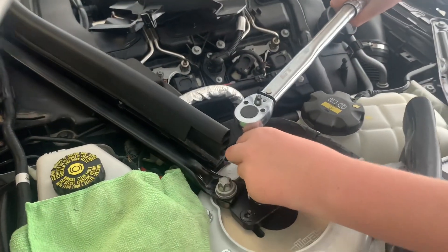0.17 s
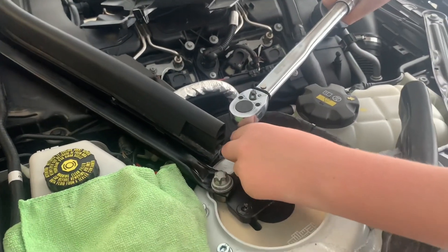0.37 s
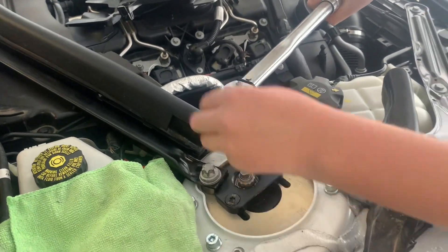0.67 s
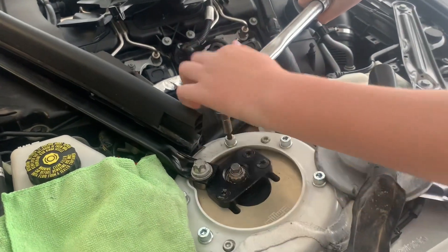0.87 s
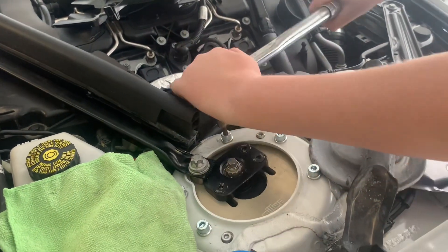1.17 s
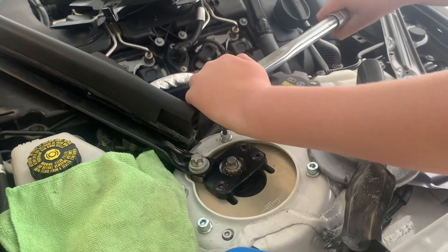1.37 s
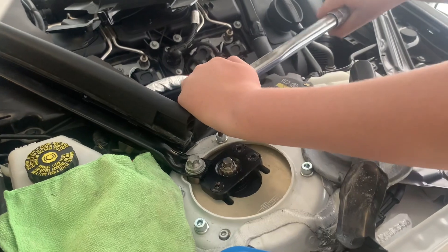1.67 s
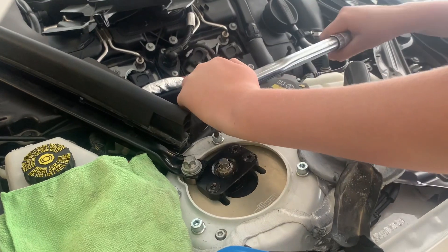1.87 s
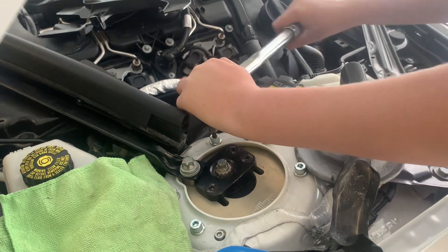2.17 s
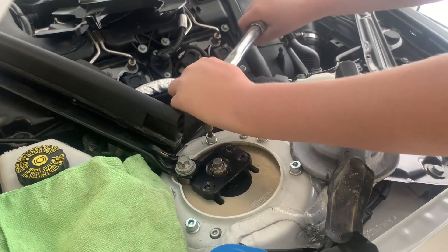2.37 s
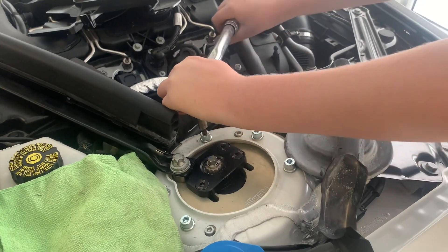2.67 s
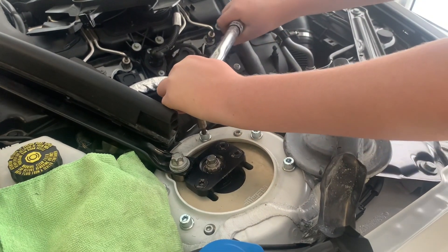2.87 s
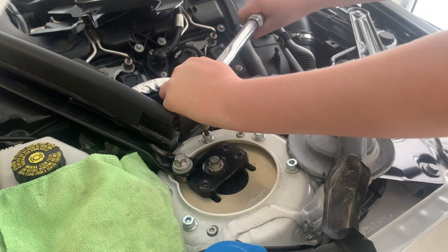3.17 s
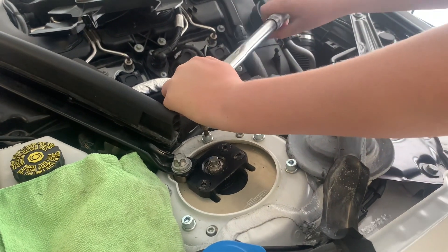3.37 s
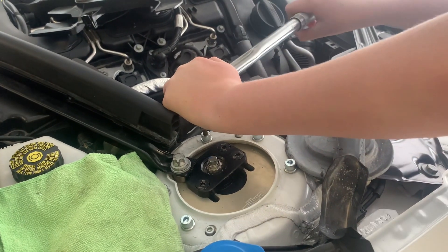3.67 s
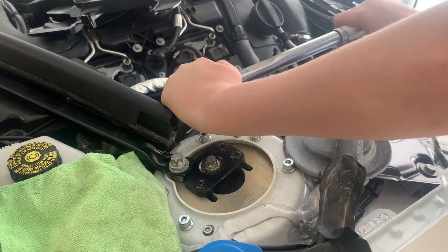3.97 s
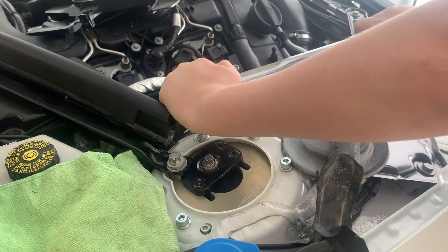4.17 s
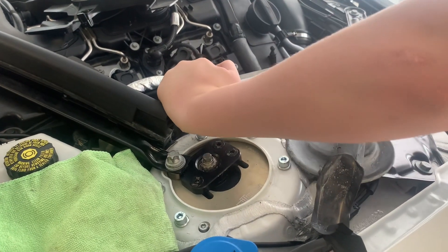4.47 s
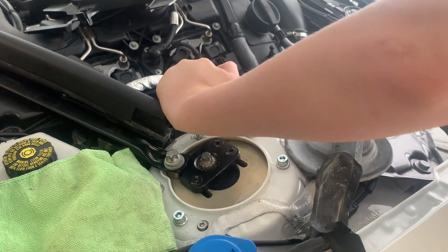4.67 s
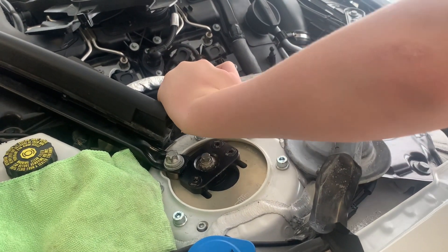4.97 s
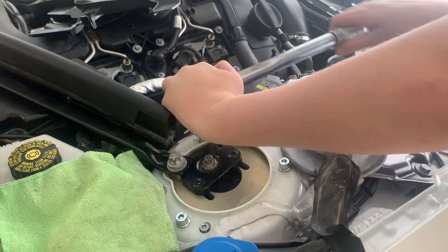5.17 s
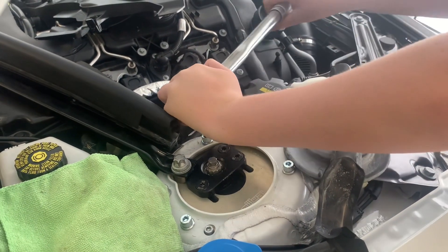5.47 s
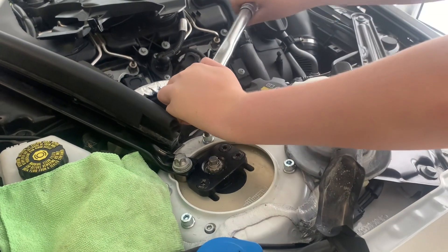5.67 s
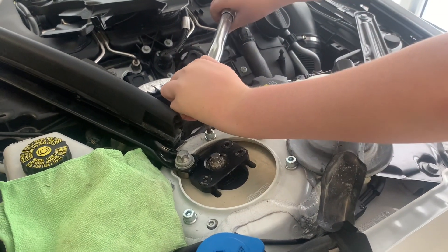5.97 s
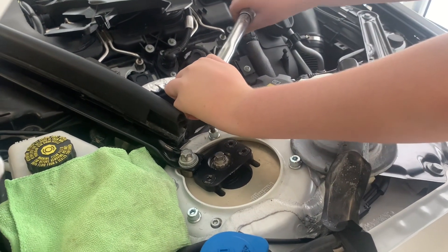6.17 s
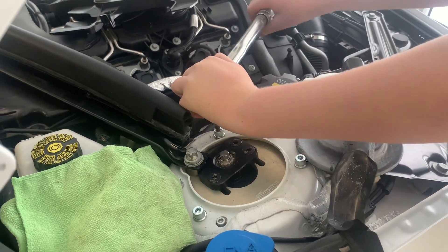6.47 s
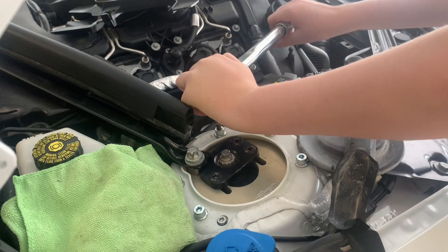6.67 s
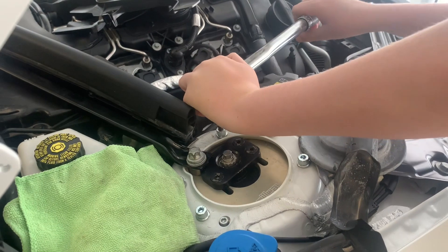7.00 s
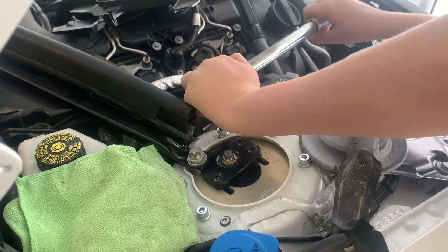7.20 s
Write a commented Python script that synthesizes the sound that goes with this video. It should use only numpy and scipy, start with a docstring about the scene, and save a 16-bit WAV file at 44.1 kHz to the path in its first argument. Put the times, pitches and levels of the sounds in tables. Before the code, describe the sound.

A socket knocks onto nuts in an engine bay, then a torque wrench gives sharp metallic clicks over faint traffic.

```python
"""In a garage, a stereo pair close to a car's strut tower; traffic rumbles outside throughout.
First a socket knocks and grinds onto the nuts: the bodywork thuds and the garage rings briefly.
Just after 2 s the click-type torque wrench reaches its set torque, trips with a sharp double click
and snaps back when eased. Near 5 s the thread squeaks; as a distant engine swells, the wrench trips
twice more and snaps back. The socket bumps again at 6.6 s and the street quietens."""
import sys
import numpy as np
from scipy import signal
from scipy.fft import rfft, irfft, next_fast_len
from scipy.io import wavfile

SR = 44100
rng = np.random.default_rng(int(sys.argv[2]) if len(sys.argv) > 2 else 0)


def dump_mix(stems):
    """Bounce the given channels to the path in sys.argv[1] as a 16-bit WAV at rate SR."""
    frames = np.atleast_2d(stems).T  # one column per channel
    limited = np.clip(frames, -1, 1)  # hard clip at full scale
    pcm = np.round(limited * 32767).astype(np.int16)
    wavfile.write(sys.argv[1], SR, pcm)


N = 323463


def from_db(db):
    return 10 ** (np.asarray(db) / 20)


def bins(size):
    return np.maximum(np.fft.rfftfreq(size, 1 / SR), 1)


def at_hz(points, hz):
    """Reads a curve along a log frequency axis."""
    point_hz, values = np.transpose(points)
    return np.interp(np.log(hz), np.log(point_hz), values)


def add(track, start_s, sound):
    """Mixes a sound in at a moment."""
    start = max(round(start_s * SR), 0)
    track[:, start:start + sound.shape[-1]] += sound[..., :N - start]


def drift(per_s):
    """Slow random wander, spread about 1."""
    return np.interp(np.arange(N) / SR * per_s, np.arange(4000), rng.standard_normal(4000))


def fade(t, rise_s, t60):
    """Swells quickly, then dies by 60 dB in t60 seconds."""
    return (1 - np.exp(-(t / rise_s) ** 2)) * from_db(-60 * t / t60)


def noise(colour_db, likeness, size):
    """Stereo noise of rms 1 with a given colour and likeness between the microphones."""
    alike = at_hz(likeness, bins(size))
    mid, side = rfft(rng.standard_normal((2, size)))
    pair = np.sqrt(1 + alike) * mid + np.sqrt(1 - alike) * side * [[1], [-1]]
    x = irfft(from_db(colour_db) * pair, size)
    return x / x.std()


def ring(t, hz, t60, level_db, rise_s, spread):
    """Struck modes of alternating sign; each reaches the two microphones a little out of phase."""
    phase = np.pi * np.arange(len(hz))[:, None] + spread * rng.standard_normal((2, len(hz), 1))
    envelopes = from_db(level_db)[:, None] * fade(t, rise_s, t60[:, None])
    return np.sum(envelopes * np.sin(2 * np.pi * hz[:, None] * t + phase), axis=1)


# diffuse sound at the pair: (f/Hz, left-right likeness)
AIR_LIKENESS = [(60, 0.87), (160, 0.95), (350, 0.57), (700, 0.11), (1400, 0.15), (3000, 0), (12000, 0.1)]

def steady(spectrum):
    """Diffuse noise that falls by 30 dB per octave beyond the ends of its spectrum."""
    size = next_fast_len(N)
    hz = bins(size)
    octaves_outside = np.abs(np.log2(hz / np.clip(hz, spectrum[0][0], spectrum[-1][0])))
    return noise(at_hz(spectrum, hz) - 30 * octaves_outside, AIR_LIKENESS, size)[:, :N]


# the street, heard from indoors: (t/s, road level/dB, tyre level/dB)
TRAFFIC_LEVELS = [(0.0, -56.5, -61), (0.28, -56.5, -65), (0.51, -60.5, -66), (1.73, -61.5, -63.5),
                  (3.61, -64, -66), (4.55, -58, -62), (5.04, -58.5, -65), (5.92, -67.5, -72),
                  (6.25, -72, -70), (6.61, -66, -68.5), (7.33, -74.5, -69.5)]
# its three spectra: (f/Hz, relative level/dB)
RUMBLE_SPECTRUM = [(24, -25), (32, -5.5), (48, -5), (62, -0.5), (86, -2.5), (105, -7), (125, -12),
                   (160, -11.5)]
ROAD_SPECTRUM = [(65, -28.5), (110, 0), (193, -5), (274, -3), (311, -8), (466, -10), (613, -13), (800, -19),
                 (1040, -46.5), (1760, -120)]
TYRE_SPECTRUM = [(350, -37.5), (600, -10.5), (738, -4.5), (786, -1), (1050, 0), (1230, -7), (1570, -7),
                 (1710, -8.5), (2840, -26), (4000, -29.5), (5200, -56), (8800, -120)]

def traffic():
    """Outside: uneven road noise and tyre hiss, over a rumble that partly follows the road noise."""
    times, *levels = np.transpose(TRAFFIC_LEVELS)
    road_db, tyre_db = [np.interp(np.arange(N) / SR, times, db) for db in levels]
    rumble_db = -55.5 + 0.41 * (road_db - road_db.mean())
    rumble = from_db(rumble_db + 2.0 * drift(per_s=12)) * steady(RUMBLE_SPECTRUM)
    road = from_db(road_db + 2.2 * drift(per_s=24)) * steady(ROAD_SPECTRUM)
    tyres = from_db(tyre_db + 0.05 + 1.3 * drift(per_s=22)) * steady(TYRE_SPECTRUM)
    return rumble + road + tyres


# background hiss: (f/Hz, relative level/dB)
HISS_SPECTRUM = [(1500, -5), (3000, 1), (5000, 2.5), (8500, -1.5), (10000, 3.5), (14000, -5.5),
                 (15000, -21)]

def room_tone():
    """All round the microphones: a faint steady whir and hiss."""
    whir = from_db(-74) * steady([(800, -38), (1075, 1), (1400, -39.5)])
    return whir + from_db(-82) * steady(HISS_SPECTRUM)


# resonances of the socket: (f/Hz, relative level/dB)
SOCKET_RESONANCES = [(850, 4), (1060, 10), (1250, -2), (1400, 10.5), (1550, -7), (1720, 6), (2200, -3.5),
                     (2500, -0.5), (2800, 0), (3080, -4.5), (3500, -0.5), (4500, -2.5), (5400, -2),
                     (7000, 2), (8800, -2), (10000, 9.5), (15000, -6.5)]

def socket_colour(hz, centre_hz, octaves):
    """A broad peak in dB, coloured by the resonances of the socket."""
    return at_hz(SOCKET_RESONANCES, hz) - 24 * np.log1p(0.58 * (np.log2(hz / centre_hz) / octaves) ** 2)


# socket meeting nut: (t/s, level/dB, centre/Hz, width/octaves, t60/s, top/Hz, plate clack 0-1)
KNOCKS = [(0.1178, -30, 4920, 0.76, 0.035, 15000, 0.27), (.13, -43, 705, 0.65, 0.069, 2000, 0.1),
          (.174, -45.5, 650, 0.46, 0.078, 3000, 0.15), (0.3064, -34.5, 1180, 1.5, .042, 8900, 0.37),
          (.308, -53.5, 5500, 0.62, 0.075, 10900, 0.3), (0.4101, -46, 2290, 1.6, 0.022, 16000, 0.6),
          (0.671, -48.5, 4860, 0.69, 0.011, 12000, 0), (1.078, -59.5, 3470, .3, 0.022, 7000, 0),
          (1.3257, -31.5, 2700, 0.45, 0.024, 6000, 0.47), (1.3258, -38.5, 1510, 1.4, 0.044, 11000, 0),
          (1.3412, -35, 1440, 1.57, 0.057, 9600, 0.57), (1.433, -50, 258, 0.43, 0.059, 2000, 0.45),
          (1.556, -59, 4060, 0.58, 0.022, 6960, 0), (1.8174, -48, 760, 1.55, 0.06, 5000, 0),
          (1.838, -52.5, 376, 0.26, 0.09, 2000, 0.06), (2.059, -64.5, 6260, 0.39, 0.022, 9030, 0),
          (2.765, -57, 240, 0.69, 0.12, 3000, 0.01), (4.604, -46.5, 1820, 0.38, 0.027, 2820, 0),
          (5.1149, -37, 1170, 0.96, 0.023, 1900, 0.07), (5.131, -60.5, 4000, 1.6, 0.04, 7500, 0.04),
          (5.182, -56.5, 8900, 1.05, 0.069, 15000, 0.35), (6.589, -42.5, 1050, 1.7, 0.042, 6500, 0.07),
          (6.625, -46, 110, 0.7, 0.1, 1500, 0), (7.275, -72.5, 3510, 1.2, .03, 8000, 0.05)]
# flat clack of the plate under the nut: (f/Hz, relative level/dB)
PLATE_SPECTRUM = [(100, -30), (340, -17), (450, -1.5), (530, -5), (620, -10), (700, -4), (820, -5),
                  (1200, -8), (1700, -14.5), (2600, -14), (8000, -42)]
# knocks at the pair: (f/Hz, left-right likeness)
KNOCK_LIKENESS = [(200, 0.99), (600, 0.68), (1500, 0.33), (4000, 0.13), (10000, 0.05)]

def knocks(size=12000):
    """Close, just left of centre: steel on steel, damped by the hands; most also clack the plate."""
    out, t, hz = np.zeros((2, N)), np.arange(size) / SR, bins(size)
    for start_s, level_db, centre_hz, octaves, t60, top_hz, clack in KNOCKS:
        colour_db = socket_colour(hz, centre_hz, octaves) - 10 * np.log10(1 + (hz / top_hz) ** 8)
        steel = noise(colour_db, KNOCK_LIKENESS, size) * fade(t, rise_s=0.0015, t60=t60)
        plate = noise(at_hz(PLATE_SPECTRUM, hz), KNOCK_LIKENESS, size) * fade(t, rise_s=0.0027, t60=0.06)
        add(out, start_s, from_db(level_db) * (steel + clack * plate))
    return out * from_db([[.8], [-.8]])


# decay of the garage: (f/Hz, t60/s)
GARAGE_T60 = [(150, .36), (600, .27), (2000, .3), (6000, .275), (14000, .23)]
# its echoes against the direct sound: (f/Hz, level/dB)
GARAGE_LEVELS = [(100, -7), (350, 7), (800, 0), (2000, -9), (4000, -2.5), (8000, -9), (10500, -10.5),
                 (13500, -13.5), (14700, -21), (16000, -34)]

def garage(direct, size=24000):
    """Diffuse echoes from the bonnet and the walls beyond; the treble dies first."""
    t, hz = np.arange(size) / SR, bins(size)
    field = rfft(noise(0 * hz, AIR_LIKENESS, size)) * from_db(at_hz(GARAGE_LEVELS, hz))
    band_hz, band_t60 = np.transpose(GARAGE_T60)
    response = 0
    for share, t60 in zip(np.eye(len(band_hz)), band_t60):
        band = irfft(field * np.interp(np.log(hz), np.log(band_hz), share), size)
        decay = fade(t, rise_s=0.0031, t60=t60)
        response = response + band * decay / np.linalg.norm(decay)
    return signal.fftconvolve(direct, response, axes=1)[:, :N]


# modes of the strut tower and inner wing: (f/Hz, t60/s, relative level/dB)
BODY_MODES = [(137.7, 0.28, -1), (188, 0.23, 1), (225, 0.32, -6.5), (274.4, 0.25, -3.5),
              (364.7, 0.37, -1.5), (390.3, 0.17, -6), (474, 0.2, -7.5), (582, 0.13, 1.5), (649, 0.1, -1),
              (780, 0.08, -3), (860, 0.06, -8.5), (1030, 0.07, -8.5)]
# the tower takes the weight of the tool: (t/s, level/dB, driven f/Hz)
THUDS = [(0.1264, -33.5, 209), (0.1286, -41.5, 597), (0.282, -42, 200), (0.3041, -37.5, 197),
         (0.316, -36, 620), (1.3208, -45, 215), (1.3428, -38.5, 188), (1.3475, -37.5, 640),
         (1.3697, -36, 140), (1.388, -43, 282), (1.823, -51, 194), (2.767, -52.5, 190), (2.186, -54, 480),
         (2.511, -56, 450), (5.116, -60.5, 320), (5.353, -47.5, 370), (5.574, -48.5, 523.5),
         (5.904, -51, 400), (5.906, -47.5, 720), (6.593, -43.5, 258), (6.627, -48.5, 198)]

def thuds(size=16384):
    """Knocks and snaps pass through the nut into the bodywork; modes near the driven pitch boom most."""
    out, t = np.zeros((2, N)), np.arange(size) / SR
    mode_hz, mode_t60, mode_db = np.transpose(BODY_MODES)
    for start_s, level_db, driven_hz in THUDS:
        drive_db = -19.5 * np.abs(np.log2(mode_hz / driven_hz))
        boom = ring(t, mode_hz, mode_t60, mode_db + drive_db, rise_s=0.0036, spread=0.29)
        add(out, start_s, from_db(level_db) * boom)
    return out * from_db([[.4], [-.4]])


# friction of socket, nut and hand: (middle t/s, half length/s, level/dB, centre/Hz, width/octaves)
RUBS = [(0.274, 0.0076, -72, 2650, .2), (.29, 0.0096, -63, 2620, 0.7), (.299, 0.011, -53, 1310, 0.99),
        (.3, 0.028, -49, 637, 0.71), (0.995, 0.18, -82, 4540, 1), (1.419, 0.046, -77, 1975, 0.61),
        (2.148, 0.033, -65.5, 5500, 0.61), (4.54, 0.025, -74.5, 3960, 0.39), (4.6, 0.23, -72, 1550, .35),
        (4.979, .11, -80, 4160, 0.75), (5.329, 0.034, -74.5, 5360, 0.64), (6.521, 0.07, -88, 5000, .7)]

def rubs(size=32768, grain_db=6.5):
    """Close and quiet: the socket grinds on the nut and skin drags over steel, in grainy swells."""
    out, t = np.zeros((2, N)), (np.arange(size) - size / 2) / SR
    for middle_s, half_s, level_db, centre_hz, octaves in RUBS:
        swell = from_db(level_db + grain_db * drift(per_s=100)[:size]) * np.exp(-(t / half_s) ** 2)
        rub = swell * noise(socket_colour(bins(size), centre_hz, octaves), AIR_LIKENESS, size)
        add(out, middle_s + t[0], rub[:, middle_s + t >= 0])
    return out


# engines in the street:
# (full from t/s, until t/s, level/dB, top f/Hz, rise/s, fall/s, throb/dB, octave overtone/dB)
ENGINES = [(0.649, 2.7, -60.5, 49.13, 0.28, 1.1, -0.5, -2), (5.2, 6.37, -57, 73.32, 1.6, 0.47, 5.5, -22)]

def engines(sag_per_s=.02, throb_period_s=0.75, throb_peak_s=6.05):
    """Far off: low, throbbing tones with their octaves, highest in pitch on reaching full strength."""
    out, t = 0, np.arange(N) / SR
    throb = np.cos(2 * np.pi * (t - throb_peak_s) / throb_period_s)
    for full_s, until_s, level_db, top_hz, rise_s, fall_s, throb_db, octave_db in ENGINES:
        swell_db = -10 * (np.maximum(full_s - t, 0) / rise_s + np.maximum(t - until_s, 0) / fall_s) ** 2
        hz = top_hz * (1 - sag_per_s * np.abs(t - full_s))
        phase = 2 * np.pi * np.cumsum(hz) / SR
        gain = from_db(level_db + swell_db + throb_db * throb + 1.5 * drift(per_s=10))
        out = out + gain * np.sqrt(2) * (np.sin(phase) + from_db(octave_db) * np.sin(2 * phase))
    return out


def grip_colour(hz, tilt, accents, octaves=.1):
    """Load and grip tilt a click's spectrum and lift or dip a few narrow regions, in dB."""
    accent_db = sum(db * np.exp(-(np.log2(hz / centre_hz) / octaves) ** 2) for centre_hz, db in accents)
    return tilt * np.log2(hz / 6000) + accent_db


# the pawl's first contact, and the crack that follows: (f/Hz, relative level/dB)
CONTACT_SPECTRUM = [(1000, -29), (3500, -9.5), (7500, -5), (9000, 3.5), (11000, -2), (13500, 7),
                    (15300, -2.5), (16500, -13)]
CRACK_SPECTRUM = [(60, -39), (150, -28.5), (400, -14), (800, -13.5), (1300, -5), (2300, -5), (3600, -4),
                  (5300, -1.5), (8800, 3.5), (10500, 1), (11900, -10.5), (13500, 1.5), (15300, -7),
                  (16500, -15.5)]
# both at the pair: (f/Hz, left-right likeness)
CLICK_LIKENESS = [(300, .8), (2000, 0.17), (4000, .3), (7500, 0.4), (9000, .93), (15000, 0.57)]
# ring of the steel wrench: (f/Hz, t60/s, relative level/dB on tripping, and on snapping back)
WRENCH_MODES = [(1390, 0.043, -26, -25.5), (1720, 0.068, -21, -32.5), (1980, 0.084, -26.5, -27.5),
                (2770, 0.03, -20, -21.5), (3450, 0.058, -19, -20), (3600, 0.062, -17, -27),
                (3910, 0.035, -20.5, -24.5), (4630, 0.056, -17.5, -24.5), (5040, 0.04, -13.5, -26),
                (4830, .05, -20, -32), (6040, 0.027, -18, -20.5), (6430, 0.029, -18.5, -20),
                (6720, 0.07, -22, -22.5), (7240, 0.077, -23.5, -19.5), (7700, 0.063, -24, -21),
                (8670, 0.032, -15.5, -13.5), (9150, 0.027, -18.5, -24), (9750, 0.021, -18.5, -16),
                (10100, 0.027, -19.5, -14), (12500, .04, -11, -16.5), (13700, 0.035, -20.5, -18)]

def click(t60, tilt, accents, back, size=8192):
    """The pawl tips over and slaps the tube: a bright snap, then the ring of the steel."""
    t, hz = np.arange(size) / SR, bins(size)
    colour_db = grip_colour(hz, tilt, accents)
    contact = noise(at_hz(CONTACT_SPECTRUM, hz) + colour_db, CLICK_LIKENESS, size)
    contact *= fade(t, rise_s=0.0005, t60=0.0044)
    # slower bending waves fill the tube a moment later
    crack = noise(at_hz(CRACK_SPECTRUM, hz) + colour_db, CLICK_LIKENESS, size)
    crack *= fade(t, rise_s=0.00085, t60=t60)
    mode_hz, mode_t60, trip_db, back_db = np.transpose(WRENCH_MODES)
    mode_db = trip_db + back * (back_db - trip_db) + .8 * grip_colour(mode_hz, tilt, accents)
    detune = 1 + .01 * rng.standard_normal(len(mode_hz))   # the hand shifts the modes each time
    steel = ring(t, mode_hz * detune, mode_t60, mode_db, rise_s=0.0012, spread=0.7)
    return from_db(3.0) * (contact + crack) + from_db(0.4) * steel


# clicks across the pair: (f/Hz, left minus right level/dB)
CLICK_BALANCE = [(1000, 2.5), (4000, 1.5), (5700, -2.5), (7500, -2.5), (10000, 1)]

def to_microphones(clicks, left_lag_s=0.00031, lag_from_hz=7000):
    """From the wrench head, the right microphone gets the middle treble stronger and the top earlier."""
    size = clicks.shape[1]
    hz, (left, right) = bins(size), rfft(clicks)
    lean = from_db(at_hz(CLICK_BALANCE, hz) / 2)
    lag = np.exp(-2j * np.pi * left_lag_s * np.maximum(hz - lag_from_hz, 0))
    return irfft([left * lean * lag, right / lean], size)


# the pawl lets go:
# (t/s, relative level/dB, t60/s, tilt/dB per octave, 0 trip - 1 snap back, accents [(f/Hz, gain/dB)])
PAWL_TICKS = [(2.1742, -32, 0.04, 0, .1, [(6400, 3.8)]), (2.4818, -30, 0.02, 1.2, .6, [(3950, 9),
              (6620, 15), (8200, 5)]), (5.3403, -34.5, 0.027, -.4, 0.15, [(6900, 3.1)]),
              (5.5542, -34.5, .033, -.4, 0.44, [(5200, 12), (13200, 7)]),
              (5.8673, -32, 0.02, -0.16, .8, [(1200, 8), (6400, 13)])]
# the full snaps: the same columns, then the tones left ringing [(f/Hz, level/dB)]
PAWL_SNAPS = [(2.1816, -25.5, 0.067, .8, 0, [(3200, 1.5), (3880, 10.5), (6430, 10), (8400, 8), (12300, 5),
              (14700, -13)], [(3740, -52), (6400, -55), (8520, -57)]),
              (2.5085, -24.5, 0.039, -0.5, 0.61, [(2080, 16.5), (2900, 5), (3750, 6.5), (8200, 5.5),
              (11300, 9.5)], [(2003, -48.5), (3630, -56), (6578, -60.5), (8032, -52)]),
              (5.3477, -25, 0.04, -0.9, 0, [(2300, -8), (3520, 0), (6650, 2.5), (15000, 12)], [(3478, -57),
              (4883, -54), (6035, -52), (6675, -49.5)]), (5.57, -24, 0.036, 0, 0.043, [(3100, -4.5),
              (3560, 3.5), (5080, 5), (6100, 3), (9300, 1), (13200, 7)], [(3605, -58), (5075, -53),
              (6120, -54), (7330, -49.5)]), (5.9, -23.5, 0.026, -1.3, .9, [(2900, 7.5), (6050, 14),
              (7400, 6), (9800, 3), (13900, 7)], [(3160, -57.5), (3470, -59), (7400, -49), (9658, -62)])]

def wrench(accent_share):
    """Close to the pair: each double click is a light tick and then the full snap."""
    out = np.zeros((2, next_fast_len(N)))
    for start_s, level_db, t60, tilt, back, accents, *_ in PAWL_TICKS + PAWL_SNAPS:
        scaled_accents = [(hz, accent_share * db) for hz, db in accents]
        add(out, start_s, from_db(level_db) * click(t60, tilt, scaled_accents, back))
    return to_microphones(out)[:, :N]


def after_ring(size=20000, t60=.25):
    """A few thin, wavering tones of the tube outlast each snap; the grip decides which."""
    out, t = np.zeros((2, N)), np.arange(size) / SR
    for start_s, *_, tones in PAWL_SNAPS:
        for hz, level_db in tones:
            waver = 1 + .7 * drift(per_s=110)[:size]
            tone = ring(t, np.array([hz]), np.array([t60]), [level_db], rise_s=.003, spread=0.53)
            add(out, start_s, waver * tone)
    return out


# harmonics of the squeaking thread, lowest first: (level/dB)
SQUEAK_HARMONICS = [-81, -80.5, -88.5]

def squeak(middle_s=4.975, half_s=.13, pitch_hz=2350, sag_hz_per_s=250, wobble_hz=78):
    """At the nut, the thread sticks and slips under load: a thin, raspy tone that sinks a little."""
    t = np.arange(N) / SR - middle_s
    hz = pitch_hz - sag_hz_per_s * t + wobble_hz * drift(per_s=500)
    phase = 2 * np.pi * np.cumsum(hz) / SR
    tone = sum(from_db(db) * np.sin(k * phase) for k, db in enumerate(SQUEAK_HARMONICS, 1))
    rasp = from_db(2.4 * drift(per_s=130))
    return tone * rasp * np.exp(-(t / half_s) ** 4)


def scene():
    """Tool and bodywork up close, the garage around them, the street beyond."""
    socket = knocks()
    tool = wrench(accent_share=1) + after_ring() + socket
    # the accents are directional, so the echoes carry only a share of them
    echoes = garage(wrench(accent_share=0.42) + socket)
    air = room_tone()
    return tool + echoes + thuds() + traffic() + engines() + air + rubs() + squeak()


def record(dry):
    """The left microphone is a little weaker; the top is cut."""
    low_pass = signal.ellip(10, .1, 80, 15950, fs=SR, output="sos")
    return signal.sosfilt(low_pass, dry * from_db([[-.3], [.3]]))


dry = scene()
out = record(dry)
dump_mix(out)
```